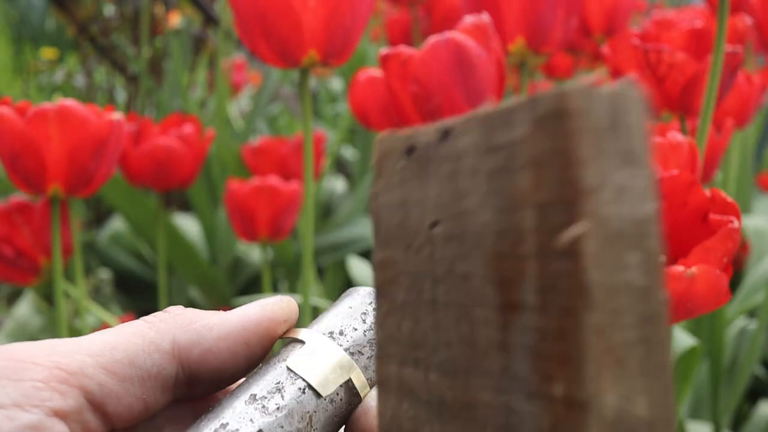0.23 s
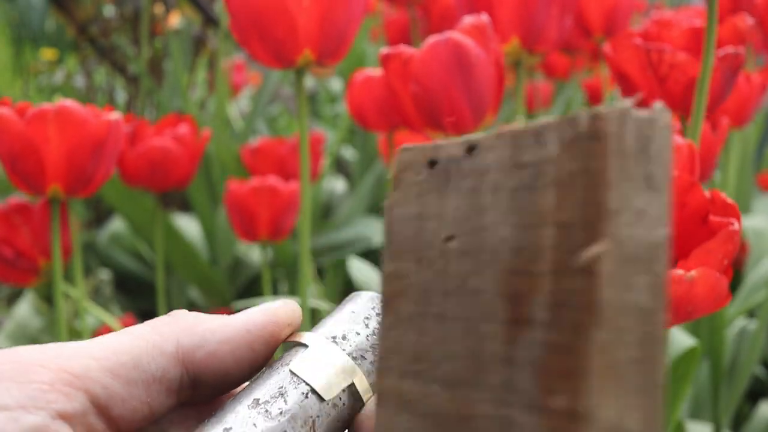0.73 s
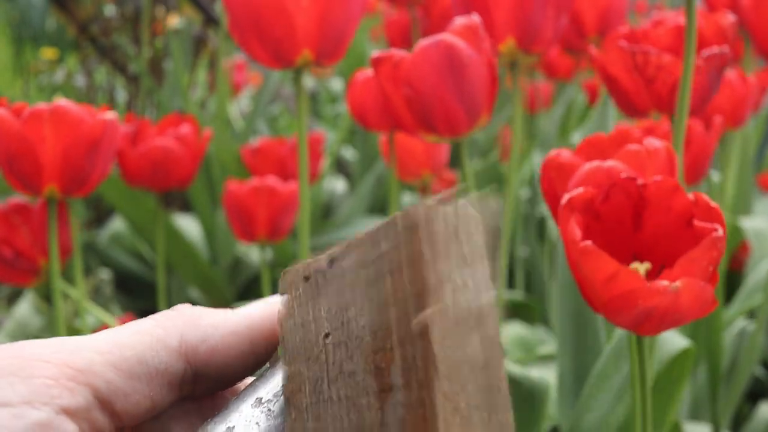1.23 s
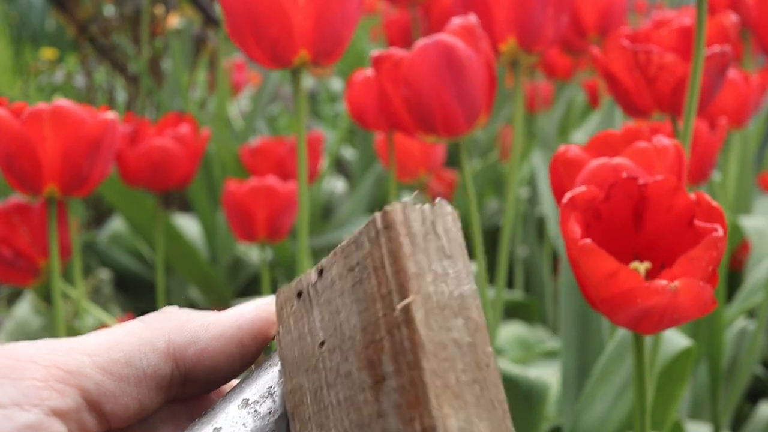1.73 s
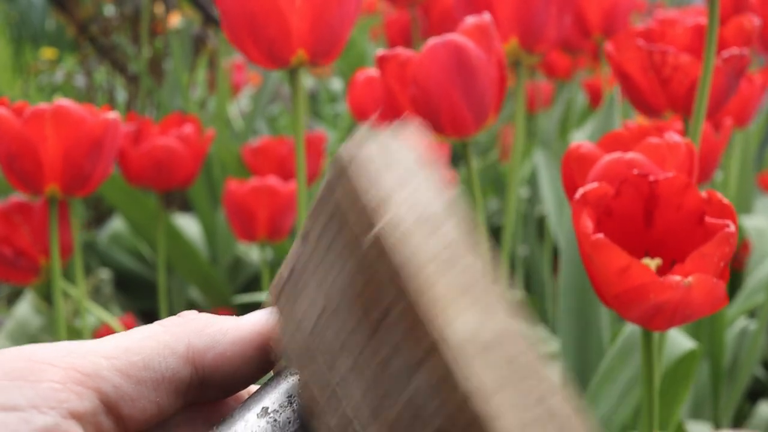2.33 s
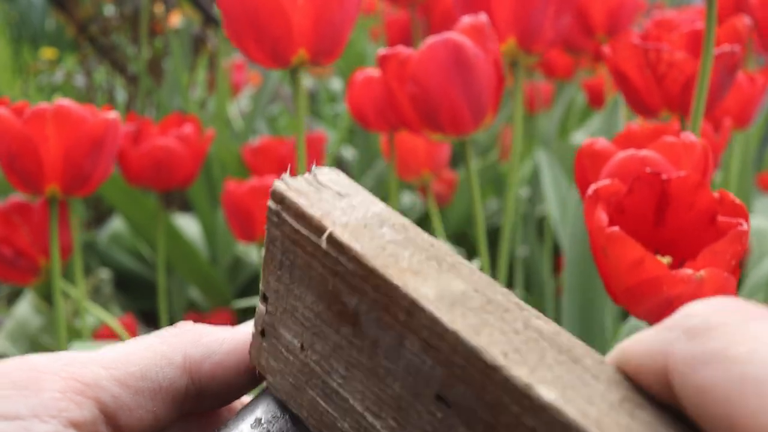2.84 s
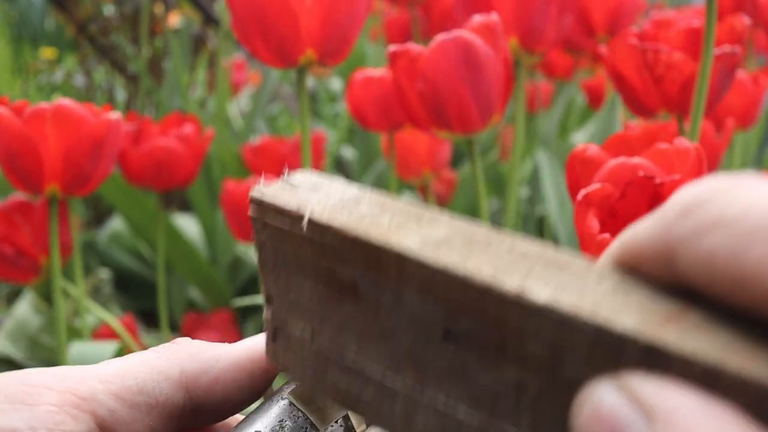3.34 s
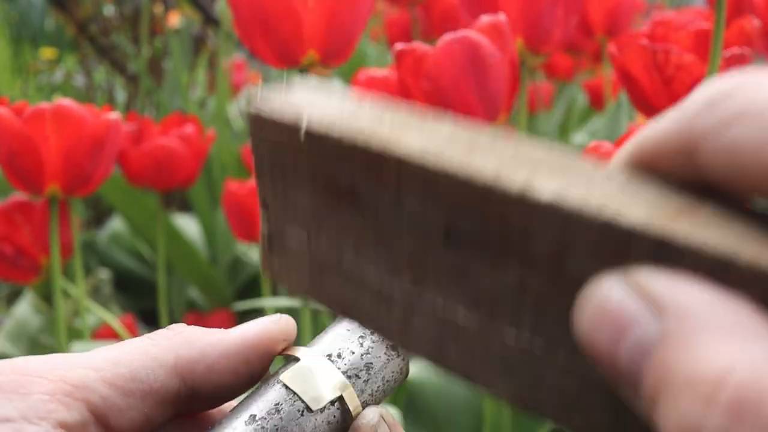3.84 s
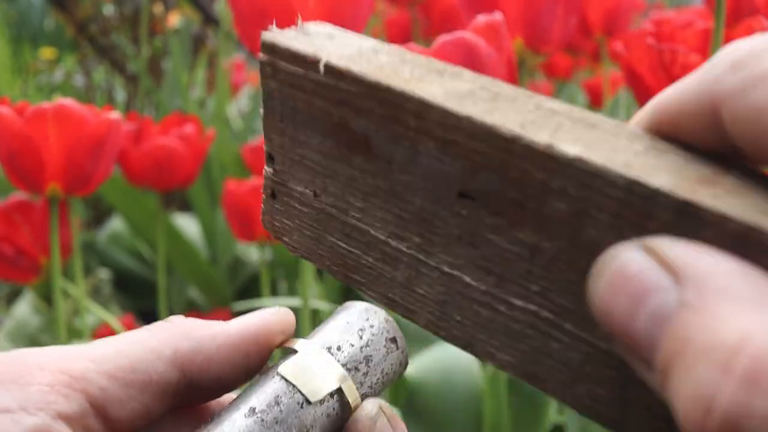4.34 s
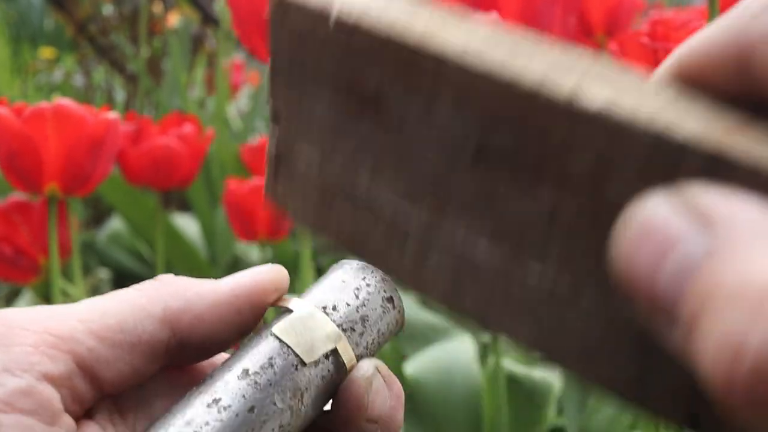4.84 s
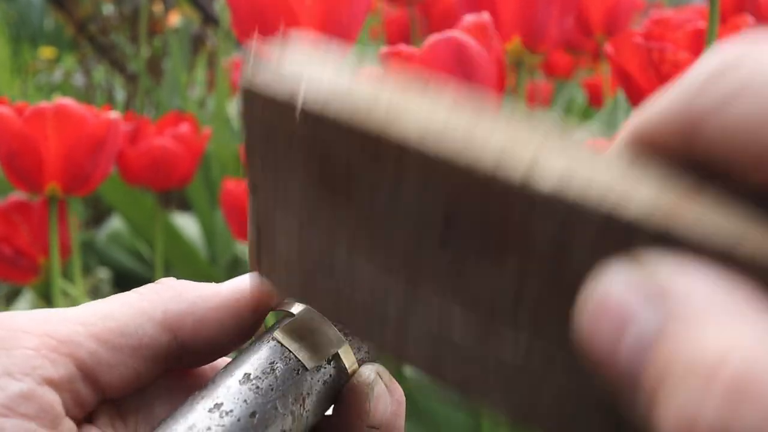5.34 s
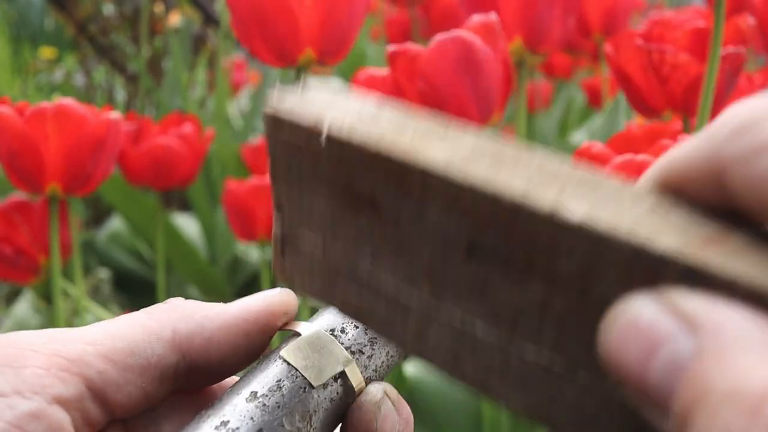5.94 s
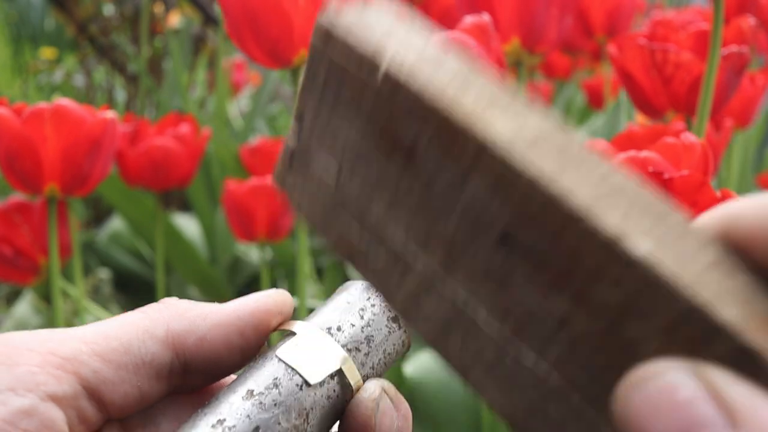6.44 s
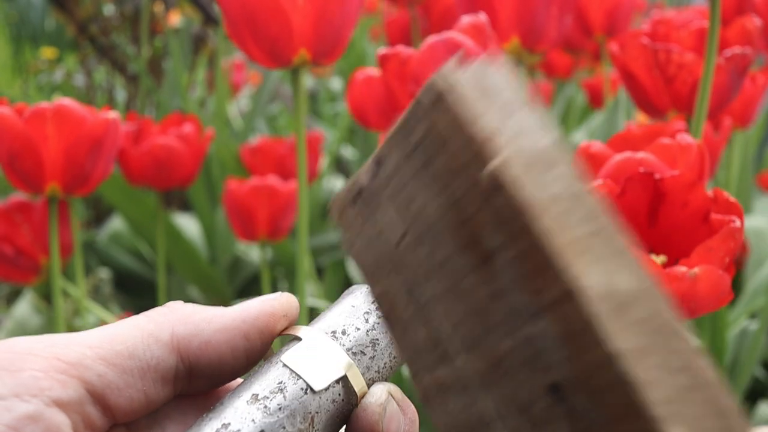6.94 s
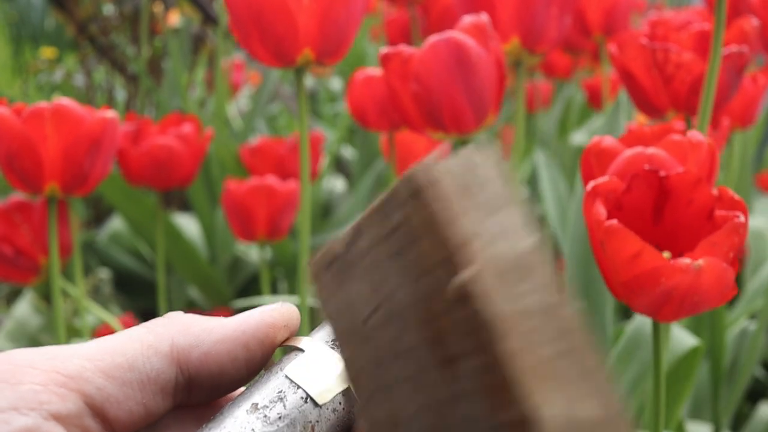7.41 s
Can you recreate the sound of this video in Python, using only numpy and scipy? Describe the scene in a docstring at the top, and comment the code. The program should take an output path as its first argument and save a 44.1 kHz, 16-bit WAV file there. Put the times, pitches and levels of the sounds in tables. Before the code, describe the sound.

A small wooden board taps a brass strip around a hand-held steel rod, steady dry knocks about four a second, close up in a quiet garden.

```python
"""A wooden block taps a brass strip round a hand-held steel rod, about four times a second, close to the microphone.
Each blow is a short clack pulse; damped modes make the board knock and thud and the rod ring in the hand,
and grainy noise makes the wood fibres crunch on the brass.
Garden plants throw back a short tail of scattered echoes, over a quiet rumble with a low drone, a breeze,
faint whines and brushes of skin on wood; the hardest blows overload the microphone."""
import sys
import numpy as np
from scipy import signal
from scipy.fft import rfft, irfft, next_fast_len
from scipy.io import wavfile

SR = 44100
rng = np.random.default_rng(int(sys.argv[2]) if len(sys.argv) > 2 else 0)


def dump_mix(stems):
    """Bounce the given channels to the path in sys.argv[1] as a 16-bit WAV at rate SR."""
    frames = np.atleast_2d(stems).T  # one column per channel
    limited = np.clip(frames, -1, 1)  # hard clip at full scale
    pcm = np.round(limited * 32767).astype(np.int16)
    wavfile.write(sys.argv[1], SR, pcm)


N = 338247

# blows, one a row: t/s, strength level/dB, contact f/Hz (higher = shorter contact), crunch level/dB
BLOWS = [(0.1928, -20.5, 1410, -30), (0.4307, -25, 1210, -32), (.6682, -19.5, 1520, -35),
         (0.9052, -31.5, 1170, -36), (1.1291, -34.5, 850, -32), (1.354, -29.5, 1000, -29),
         (1.578, -28, 1140, -26), (1.8076, -31.5, 845, -24.5), (2.0276, -18, 1340, -26),
         (2.249, -19.5, 1230, -38.5), (2.4607, -21, 1260, -43), (2.6792, -23, 1160, -45.5),
         (2.901, -28.5, 800, -41), (3.1272, -22.5, 940, -32.5), (3.3499, -28, 1020, -40),
         (3.5816, -28, 1020, -27), (3.8171, -18.5, 1270, -26), (4.0469, -28.5, 930, -31.5),
         (4.276, -19, 1280, -31), (4.51, -22, 1110, -30), (4.7483, -21.5, 1130, -27),
         (4.9828, -23, 1170, -27.5), (5.22, -23.5, 1170, -27), (5.465, -23.5, 1150, -32),
         (5.6991, -25, 1200, -39), (5.939, -22, 1245, -28.5), (6.1728, -22, 1360, -33.5),
         (6.402, -21, 1390, -31), (6.6497, -23, 1400, -36.5), (6.9027, -25.5, 1133, -35),
         (7.1517, -27, 1250, -34.5), (7.3922, -22, 1930, -31), (7.6339, -49, 1500, -46)]
# modes of the board: f/Hz, relative level/dB, t60/s
BOARD_MODES = [(620, -8, .024), (830, -7, .011), (1000, -5, .011), (1160, -1, .016), (1480, -2, .012),
               (1620, -5, .016), (1760, -3, .014), (2090, -1, .014), (2230, -2, .014), (2380, 0, .014),
               (2870, -8, .011)]
# modes of board and hands flexing together: f/Hz, relative level/dB, t60/s
THUD_MODES = [(169, -16.5, 0.078), (287, -2, 0.031), (366, 5.5, 0.012), (516, -16.5, 0.097),
              (635, -10.5, 0.028)]
# modes of the rod with its strip, lowest first: f/Hz, relative level/dB, t60/s
ROD_MODES = [(1298, 0, .085), (3305, -9, .03), (3346, 0, .052), (4936, -21, .045), (5879, -22, .035),
             (6056, -24, .035), (8414, -22, .028), (10960, -18, .022), (11700, -16, .022),
             (12450, -15, .024)]
# how freely the hand lets the rod ring: t/s, ring level against the blow/dB
GRIP_CURVE = [(0, -26.5), (1.7, -28.5), (2.3, -21.5), (3.55, -19), (3.85, -13), (4.3, -10), (5, -12.5),
              (6.62, -11), (6.95, -22.5)]
# spectrum of crushed fibres on brass, before its tilt: f/Hz, relative level/dB
CRUNCH_SPECTRUM = [(500, -50), (2000, 5), (3100, 5.5), (3900, 4), (5200, 5.5), (6800, 0), (8300, 4),
                   (10000, 4), (11800, 8), (13500, 3), (16000, -17)]
# near reflections off hands, ground and other close surfaces: delay t/s, level/dB
NEAR_ECHOES = [(.0023, -23.5), (.0098, -25.5), (0.0199, -31.5), (0.041, -41)]
# spectrum thrown back by the leaves: f/Hz, relative level/dB
FOLIAGE_SPECTRUM = [(100, -7.5), (400, 5), (780, -7.5), (1250, -4.5), (1900, -5.5), (2300, -0.5), (2800, 2),
                    (5000, 5.5), (9000, 2), (16000, -16.5)]
# fingers shift on the wood: t/s, half length t/s, level/dB
FINGER_SHIFTS = [(4.37, 0.022, -71), (6.862, 0.055, -69), (7.212, 0.015, -75)]
# spectrum of skin on dry wood: f/Hz, relative level/dB
SKIN_SPECTRUM = [(800, -11.5), (2500, -7.5), (5500, -14.5), (9000, -20.5), (16000, -29)]
# course of the distant rumble: t/s, level/dB before RUMBLE_GAIN_DB
RUMBLE_COURSE = [(0.0, -55.5), (1.19, -59.5), (1.75, -57.5), (2.67, -63), (4.68, -59.5), (6.77, -66.5),
                 (7.67, -66)]
# spectrum of the distant rumble: f/Hz, relative level/dB
RUMBLE_SPECTRUM = [(20, -8), (55, 0.5), (80, 0), (130, -6), (250, -6.5), (350, -12.5), (450, -9.5),
                   (600, -17), (780, -19), (1100, -16.5), (1500, -24), (2500, -32.5), (8000, -36.5),
                   (16000, -38.5)]
# gusts of the breeze: t/s, half length t/s, level/dB
BREEZE_GUSTS = [(.05, .28, -49), (1.68, 0.57, -51)]
# spectrum of the breeze: f/Hz, relative level/dB
BREEZE_SPECTRUM = [(25, -5.5), (60, -1.5), (120, -5.5), (240, 1), (400, -18), (700, -21.5), (1200, -24.5),
                   (2400, -32.5), (6000, -36.5), (16000, -41)]
# faint far-off whines: start t/s, end t/s, f/Hz, mean level/dB
FAR_WHINES = [(0.405, .62, 566, -55), (3.752, 3.815, 997, -54), (3.863, 4.24, 1440, -66),
              (4.288, 5.898, 599, -63.5), (6.402, 7.67, 444, -65)]

AGE = np.arange(-132, 8820) / SR  # seconds from the contact, with a short lead-in
MODE_SCATTER_DB = 2
BOARD_DETUNE, THUD_DETUNE, ROD_DETUNE = .025, .02, .002  # spread as a fraction of each mode's pitch
KNOCK_DB = -5  # the board's modes against the clack
PING_DB = 2.5  # the rod's overtones against its grip-damped level
# the board starts with its face to the microphone and is turned edge-on
TURN_START_S, TURN_END_S = 1.65, 2
FACE_THUD_DB, EDGE_THUD_DB = -26.5, -33.5  # the most that the yielding hands let through
THUD_OVER_CLACK_DB = 3  # a light blow's thud is held to this above its clack
FACE_CANCEL_HZ, EDGE_CANCEL_HZ = 140, 279  # tones below this cancel round the board
RUMBLE_GAIN_DB, CALM_DB = 6.5, -61.5  # lift of the rumble; floor of the breeze
HUM_HZ, HUM_DB = 59, -7.5  # drone: centre pitch, mean level against the rumble
TOP_HZ = 16300


def tap(strength_db, contact_hz, crunch_db, facing, grip_db, ping_send_db=-5):
    """One blow and its echoes: clack, knock, thud, crunch and the ring of the rod, summed."""
    thud_limit_db = EDGE_THUD_DB + facing * (FACE_THUD_DB - EDGE_THUD_DB)
    thud_db = min(thud_limit_db, strength_db + THUD_OVER_CLACK_DB)
    cancel_hz = EDGE_CANCEL_HZ + facing * (FACE_CANCEL_HZ - EDGE_CANCEL_HZ)
    pulse = burst(clack(contact_hz), strength_db)
    knock = burst(low_cut(board(contact_hz), cancel_hz), strength_db + KNOCK_DB)
    wood = pulse + knock + thud(thud_db, cancel_hz) + crunch(crunch_db)
    body, ping = rod(strength_db, grip_db)
    # the rod is small and close to the microphone, so less of its high ping reaches the plants
    to_plants = wood + body + undb(ping_send_db) * ping
    return wood + body + ping + garden(to_plants)


def clack(hz):
    """The board stops dead: suction, a sharp push of air, suction again."""
    u = np.pi * hz * AGE
    return (1 - 2 * u ** 2) * np.exp(-u ** 2)


def board(contact_hz, brighten_db=7, neutral_hz=1250, lag_s=0.00016, rebound_s=0.001923, rebound_db=-4):
    """The board springs back and knocks, then rebounds once; a shorter contact favours its higher modes."""
    modes = tilt(BOARD_MODES, brighten_db * np.log2(contact_hz / neutral_hz))
    again_s = rebound_s * np.exp(.15 * rng.standard_normal())
    first = ring(modes, AGE - lag_s, BOARD_DETUNE)
    rebound = ring(modes, AGE - again_s, BOARD_DETUNE)
    return -first - undb(rebound_db) * rebound


def thud(db, cancel_hz, lead_s=0.00051, deepen=1.0, neutral_db=-30):
    """Board and hands flex; the heavier the thud, the deeper it is."""
    modes = tilt(THUD_MODES, deepen * (neutral_db - db))
    flex = ring(modes, AGE + lead_s, THUD_DETUNE)
    # the lowest tones cancel round the edges of so small a board
    return burst(low_cut(flex, cancel_hz), db)


def crunch(db, lead_s=0.00087, snap_t60=0.003, snap_db=7, crush_t60=0.021, tail_t60=0.02, tail_db=-16,
           brighten=0.17, neutral_db=-34):
    """The strip slaps the rod as contact begins and fibres crush, with a thin fizz beneath; louder is brighter."""
    t = AGE + lead_s
    grains = rng.standard_normal(len(t)) * np.exp(.5 * rng.standard_normal(len(t)))
    snap = undb(snap_db) * fade(t, snap_t60)
    fizz = undb(tail_db) * fade(t, tail_t60)
    force = snap + fade(t, crush_t60) + fizz
    spectrum = tilt(CRUNCH_SPECTRUM, brighten * (db - neutral_db))
    return burst(colour(grains * force, spectrum), db)


def rod(strength_db, grip_db, lag_s=0.0008):
    """The rod's lowest mode, a little late, and its overtones; the hand's grip damps both."""
    body = burst(ring(ROD_MODES[:1], AGE - lag_s, ROD_DETUNE), strength_db + grip_db)
    ping = burst(ring(ROD_MODES[1:], AGE, ROD_DETUNE), strength_db + PING_DB + grip_db)
    return body, ping


def garden(blow, early_t60=0.071, early_db=-18, late_t60=0.25, late_db=-27, onset_s=0.0014):
    """Near echoes, then leaves that scatter a blow along uneven paths, drawn afresh for each blow."""
    t = AGE - AGE[0]
    response = sum(undb(db) * np.sinc((t - delay) * SR) for delay, db in NEAR_ECHOES)
    for t60, db in (early_t60, early_db), (late_t60, late_db):
        # about 6000 leaf echoes a second
        leaves = rng.standard_normal(len(t)) * (rng.random(len(t)) < 6000 / SR)
        onset = 1 - np.exp(-(t / onset_s) ** 2)
        scatter = colour(leaves * fade(t, t60) * onset, FOLIAGE_SPECTRUM)
        response = response + undb(db) * scatter / np.sqrt(np.sum(scatter ** 2))
    return signal.fftconvolve(blow, response)[:len(blow)]


def rustles():
    """Skin slides on dry wood: coloured noise in short uneven brushes."""
    noise = colour(rng.standard_normal(N), SKIN_SPECTRUM)
    return noise / np.std(noise) * swells(FINGER_SHIFTS) * undb(3 * walk(90))


def outdoors():
    """Noise rumble with a wavering low drone, and a noise breeze that settles to a calm floor after two gusts."""
    t = np.arange(N) / SR
    rumble = undb(np.interp(t, *np.transpose(RUMBLE_COURSE)) + RUMBLE_GAIN_DB)
    breeze = undb(CALM_DB) + swells(BREEZE_GUSTS)
    drone = np.sqrt(2) * np.sin(2 * np.pi * HUM_HZ * t + walk(8))
    out = rumble * undb(HUM_DB + 3 * walk(4)) * drone
    layers = (RUMBLE_SPECTRUM, rumble, .7), (BREEZE_SPECTRUM, breeze, 1.5)
    for spectrum, gain, flutter_db in layers:
        noise = colour(rng.standard_normal(N), spectrum)
        out = out + noise / np.std(noise) * gain * undb(flutter_db * walk(4.8))
    return out


def whines():
    """Narrow far-off tones, wavering in pitch and level, that swell and fade."""
    t = np.arange(N) / SR
    out = np.zeros(N)
    for start, end, hz, db in FAR_WHINES:
        progress = np.clip((t - start) / (end - start), 0, 1)
        swell = np.sqrt(np.abs(np.sin(np.pi * progress)))
        tone = np.sin(2 * np.pi * hz * t + 1.6 * walk(50))
        out += undb(db + 3 * walk(20)) * swell * tone
    return out


def ring(modes, t, detune):
    """Damped modes; grip and striking point shift their pitch and strength from blow to blow."""
    hz, db, t60 = np.transpose(modes)[:, :, None]
    chance = rng.standard_normal((len(modes), 2, 1))
    gain = undb(db + MODE_SCATTER_DB * chance[:, 0])
    pitch = hz * (1 + detune * chance[:, 1])
    return np.sum(gain * fade(t, t60) * np.sin(2 * np.pi * pitch * t), axis=0)


def fade(t, t60):
    """Exponential decay that starts at t = 0 and falls 60 dB in t60 seconds."""
    return (t >= 0) * np.exp(-np.log(1000) * np.maximum(t, 0) / t60)


def burst(x, db):
    """Scale a short sound to the energy of 10 ms at this level."""
    return x * undb(db) * np.sqrt(SR / 100 / np.sum(x ** 2))


def tilt(rows, slope):
    """Lean a spectrum or a set of modes by a slope in dB an octave above its first row."""
    return [(hz, db + slope * np.log2(hz / rows[0][0]), *rest) for hz, db, *rest in rows]


def colour(x, points):
    """Causal filter with a (f/Hz, level/dB) spectrum, made from its cepstrum."""
    size = next_fast_len(len(x))
    hz, db = np.transpose(points)
    freq = np.maximum(np.arange(size // 2 + 1) * SR / size, 1)
    cepstrum = irfft(np.interp(np.log(freq), np.log(hz), np.log(undb(db))), size)
    # fold the cepstrum to positive time: minimum phase
    cepstrum[1:size // 2] *= 2
    cepstrum[size // 2 + 1:] = 0
    return irfft(rfft(x, size) * np.exp(rfft(cepstrum)), size)[:len(x)]


def low_cut(x, hz):
    """Second-order high-pass."""
    return signal.sosfilt(signal.butter(2, hz, "high", fs=SR, output="sos"), x)


def swells(rows):
    """A bell-shaped rise and fall for each (t/s, half length t/s, level/dB)."""
    t = np.arange(N) / SR
    return sum(undb(db) * np.exp(-((t - s) / length) ** 2) for s, length, db in rows)


def walk(rate):
    """Slow chance with a spread near 1: random points, rate of them a second, joined by lines."""
    knots = rng.standard_normal(800)
    return np.interp(np.arange(N) / SR * rate, np.arange(len(knots)), knots)


def undb(db):
    """Decibels to gain."""
    return 10 ** (np.asarray(db) / 20)


def scene():
    """The run of blows in the garden, while the board turns and the grip on the rod loosens and tightens."""
    blows = np.zeros(N + len(AGE))
    for s, strength_db, contact_hz, crunch_db in BLOWS:
        facing = np.interp(s, (TURN_START_S, TURN_END_S), (1, 0))  # 1 face-on, 0 edge-on
        grip_db = np.interp(s, *np.transpose(GRIP_CURVE))
        start = int(round((s + AGE[0]) * SR))
        blows[start:start + len(AGE)] += tap(strength_db, contact_hz, crunch_db, facing, grip_db)
    return (blows[:N] + rustles() + outdoors() + whines())[None]


def record(dry, ceiling=0.42, overload_low_hz=150):
    """The microphone flattens the highest peaks, which adds grit but little bass; the top is cut."""
    grit = low_cut(np.clip(dry, -ceiling, ceiling) - dry, overload_low_hz)
    top_cut = signal.ellip(8, .2, 70, TOP_HZ, fs=SR, output="sos")
    return signal.sosfilt(top_cut, dry + grit)


dry = scene()
out = record(dry)
dump_mix(out)
```